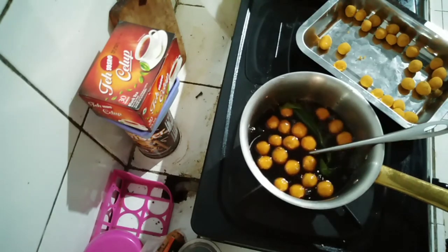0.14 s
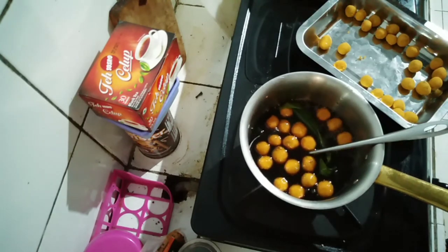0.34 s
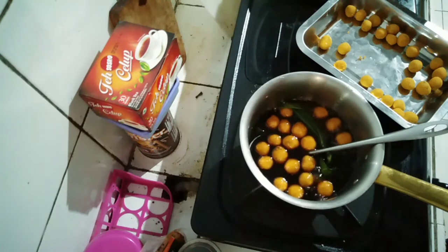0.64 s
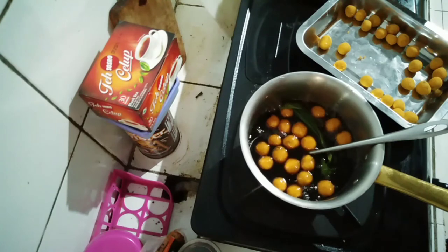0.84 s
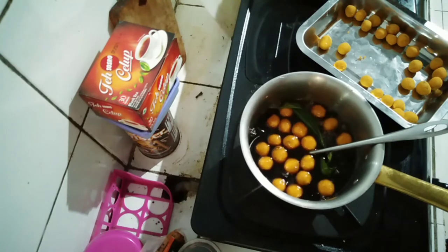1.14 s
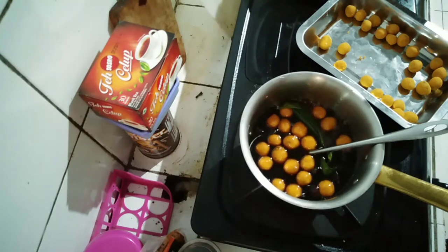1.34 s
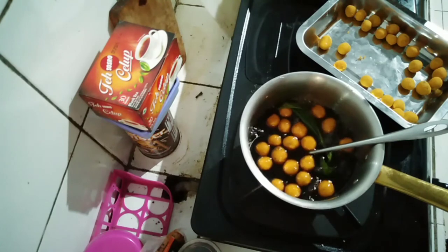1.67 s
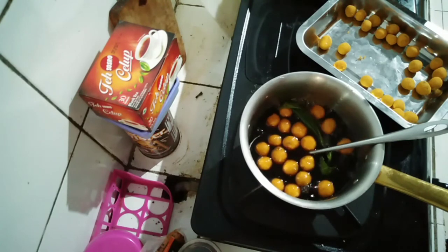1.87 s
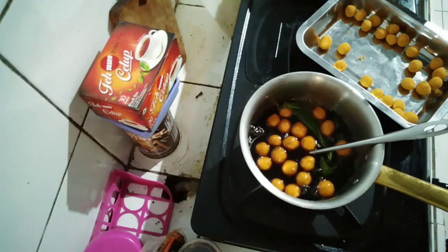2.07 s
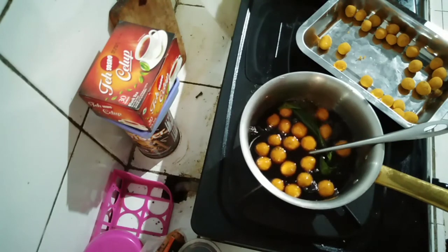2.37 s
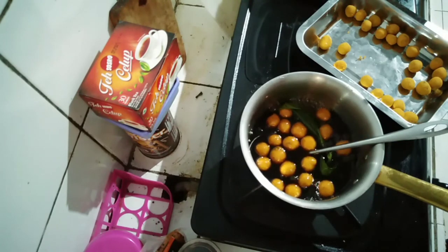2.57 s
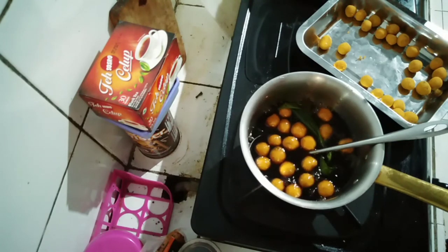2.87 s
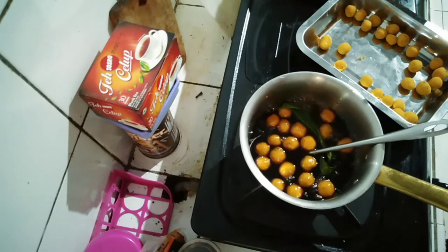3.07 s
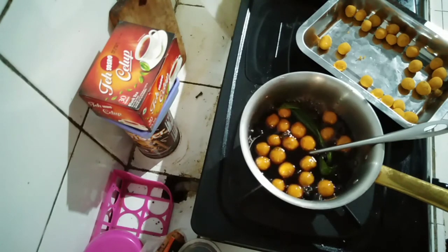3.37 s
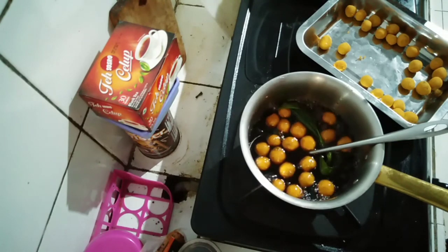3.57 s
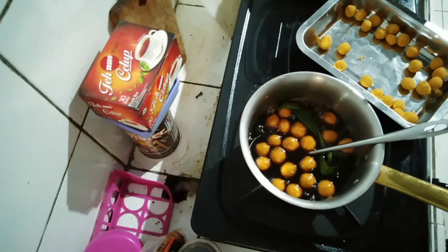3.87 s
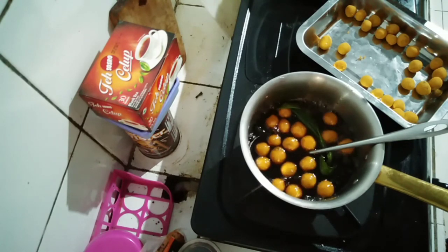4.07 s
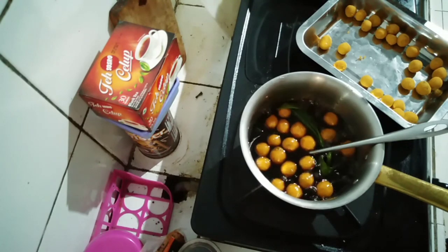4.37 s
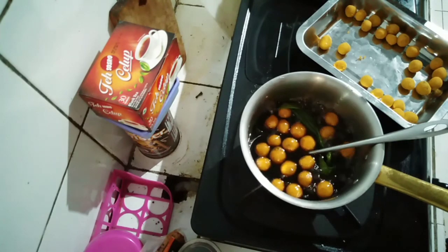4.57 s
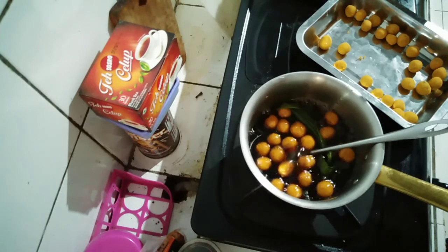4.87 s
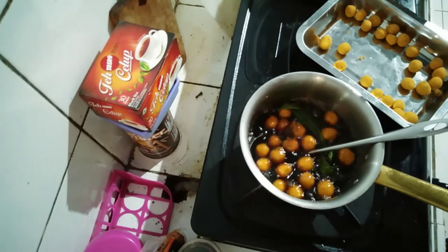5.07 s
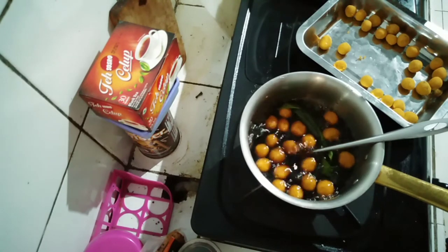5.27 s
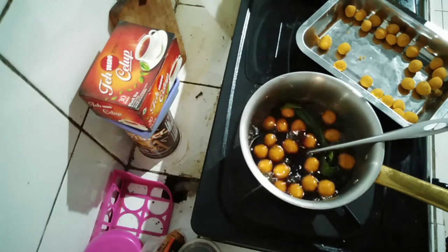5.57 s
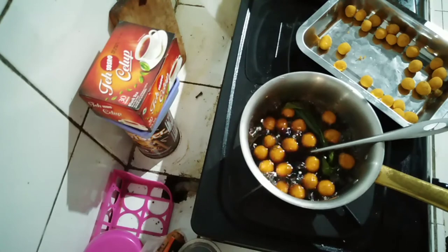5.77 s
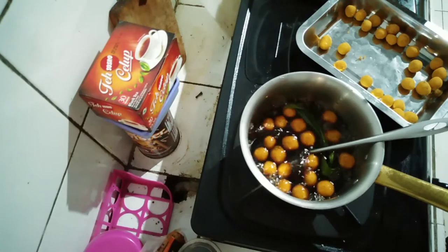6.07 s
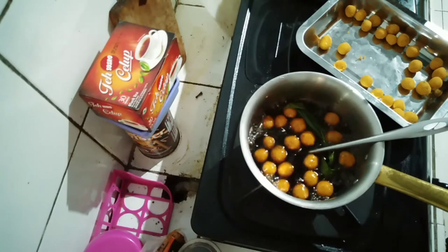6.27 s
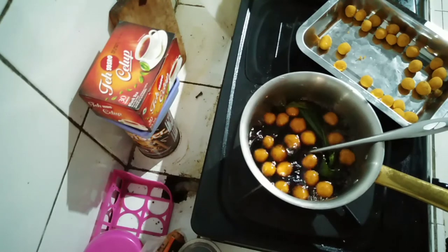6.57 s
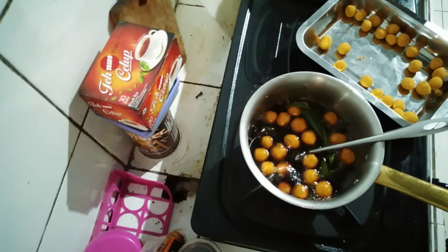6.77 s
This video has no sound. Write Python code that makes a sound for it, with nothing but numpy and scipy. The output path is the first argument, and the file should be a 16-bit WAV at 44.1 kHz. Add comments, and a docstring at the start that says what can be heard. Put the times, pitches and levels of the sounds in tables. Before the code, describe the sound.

Close to a small steel saucepan in a tiled kitchen, thick syrup simmers very faintly with low murmur, tiny singing bubbles and soft glugs. A sharp hissing spit jumps out near the middle. Then the pot boils up abruptly in a loud burst of crackling spits and round wet pops, ringing metal and room, before sinking to light bubbling with scattered spits.

```python
"""Syrup simmers in a steel saucepan in a tiled kitchen, close to a phone with two microphone ports.
From the start noise beds murmur, gurgle, rumble and fizz, a few small bubbles sing as ringing noise,
and the pot spits (ragged noise), glugs (low rising tones) and soon pops (round tones with a splash).
At about 4.6 s the syrup boils up in a loud volley of spits and pops that ring the pan and the room;
then the bubbling and fizz sink back, with scattered spits and pops to the end."""
import sys
import numpy as np
from scipy import signal
from scipy.fft import rfft, irfft, next_fast_len
from scipy.io import wavfile
from scipy.ndimage import uniform_filter1d

SR = 44100
rng = np.random.default_rng(int(sys.argv[2]) if len(sys.argv) > 2 else 0)


def master(y):
    """Save y as 16-bit WAV."""
    cut = np.clip(np.atleast_2d(y).T, -1, 1)
    pcm = np.round(cut * 32767)  # scale
    wavfile.write(sys.argv[1], SR, pcm.astype(np.int16))


N = 305613


def gain_of(db):
    """Amplitude factor of a level in dB."""
    return 10 ** (np.asarray(db) / 20)


def evened(x):
    """Scales a sound to an RMS of one."""
    return x / np.sqrt(np.mean(x ** 2) + 1e-20)


def read(points, hz):
    """Reads a curve over frequency, straight between its points on a log axis."""
    f, value = np.transpose(points)
    return np.interp(np.log(hz + 1), np.log(f + 1), value)


def add(mix, s, sound, db, pan_db=0):
    """Sets a sound to its peak level and side (positive is left) and mixes it in."""
    part = mix[:, round(s * SR):][:, :len(sound)]
    sides = gain_of(db + np.array([[.5], [-.5]]) * pan_db)
    part += (sides * sound / abs(sound).max())[:, :part.shape[1]]


def coloured(x, points):
    """Causal filter: the phase is the Hilbert transform of the log gain."""
    level = np.maximum(read(points, abs(np.fft.fftfreq(4096, 1 / SR))), -100)
    log_gain = np.log(gain_of(level))
    taps = np.fft.ifft(np.exp(np.conj(signal.hilbert(log_gain)))).real[:2048]
    return signal.oaconvolve(x, taps)[:len(x)]


def tinted(x):
    """A random bumpy colour, bumps a few hundred hertz wide: each sound favours its own patches."""
    bumps = evened(uniform_filter1d(rng.standard_normal(len(x) // 2 + 1), size=45))
    return irfft(rfft(x) * gain_of(4 * bumps), len(x))


def ragged(size, t60, depth_db, count):
    """Noise that dies away in uneven lumps about count samples long."""
    lumps = gain_of(depth_db * evened(uniform_filter1d(rng.standard_normal(size), count)))
    return rng.standard_normal(size) * lumps * gain_of(-60 * np.arange(size) / SR / t60)


def bubble(hz, rise, fall, glide):
    """A few cycles of a tone that climbs as the cavity closes; rise and fall in cycles."""
    turns = np.arange(5000) / SR * hz
    envelope = (1 - np.exp(-(turns / rise) ** 2)) * np.exp(-turns / fall)
    return envelope * np.sin(2 * np.pi * turns * (1 + glide * turns))


# Likeness of the two ports in the steady sounds: (frequency [Hz], left-right likeness [-1 to 1])
STEADY_LIKENESS = [(60, 1), (430, 0.76), (800, 0.024)]


def wash(points, patchy_db, flicker_db, size, long, wide):
    """Stereo noise with drifting patches (long frames by wide bins) and a flicker at all frequencies."""
    frames, hz = 4 * N // size + 5, np.fft.rfftfreq(size, 1 / SR)
    a, b, c, d, patches = rng.standard_normal((frames, len(hz), 5)).T
    patches = evened(uniform_filter1d(uniform_filter1d(patches, wide, 0), long, 1))
    flicker = evened(uniform_filter1d(rng.standard_normal(frames), 4))
    same = np.clip(read(STEADY_LIKENESS, hz), -1, 1)[:, None]
    left, other = a + 1j * b, c + 1j * d
    z = np.array([left, same * left + np.sqrt(1 - same ** 2) * other])
    z *= gain_of(read(points, hz)[:, None] + patchy_db * patches + flicker_db * flicker)
    return evened(signal.istft(z, nperseg=size, noverlap=3 * size // 4)[1][:, :N])


# Course of the boil: (time [s], bubbling level [dB], fizz level [dB])
BOIL = [(0, -54.5, -72), (0.75, -59, -70), (1.12, -58.5, -68.5), (1.4, -61.5, -73.5), (2.1, -59, -68),
        (2.9, -57.5, -65.5), (3.15, -65.5, -69.5), (3.7, -54.5, -68.5), (3.9, -60.5, -68.5),
        (4.595, -60, -69.5), (4.7, -32, -47), (5.1, -44, -49.5), (5.601, -52.5, -62), (6.1, -52, -62),
        (6.93, -56, -65)]


def boil_db(column):
    """Level of the bubbling (column 1) or the fizz (column 2) at every sample."""
    rows = np.transpose(BOIL)
    return np.interp(np.arange(N) / SR, rows[0], rows[column])


SIMMER_DB = -54.5  # bubbling level of a calm simmer


def over_simmer(calm_db, growth):
    """Gain of a bed: its level at a calm simmer and the dB it gains per dB of bubbling above that."""
    return gain_of(calm_db + growth * (boil_db(column=1) - SIMMER_DB))


# Low-mid murmur of the bubbling: (frequency [Hz], relative density [dB per Hz])
MURMUR_COLOUR = [(150, -69), (250, -61), (350, 19), (450, -9), (600, -67)]


def murmur():
    """Flickering noise round 350 Hz that follows the bubbling level."""
    return gain_of(boil_db(column=1)) * wash(MURMUR_COLOUR, 3., 5., size=512, long=8, wide=3)


# Middle-pitched gurgle, also tinting each pop's splash: (frequency [Hz], relative density [dB per Hz])
GURGLE_COLOUR = [(250, -50.5), (450, -14.5), (690, -0.5), (860, -5), (1020, 2.5), (1280, -16.5), (1620, 0),
                 (2000, -19.5), (2350, -13.5), (3200, -17), (4000, -37)]
SMALL_PER_S, SMALL_SPREAD_DB = 110, 4  # small bubbles: rate of all together, spread of sizes


def small_bubbles():
    """Random brief tones of many pitches, loudest where the gurgle is strong."""
    out = np.zeros((2, N))
    for hz in np.geomspace(520, 2600, 16) * rng.uniform(.95, 1.05, 16):
        chance, side = rng.random(N), rng.random(N)
        size = np.minimum(rng.exponential(1, N), 4)
        strength = gain_of(SMALL_SPREAD_DB * size + read(GURGLE_COLOUR, hz))
        train = (chance < SMALL_PER_S / 16 / SR) * strength
        tone = bubble(hz, 0.011 * hz, 0.013 * hz, 0.00022)
        out += signal.oaconvolve(train * np.array([side, 1 - side]), tone[None])[:, :N]
    return evened(out)


def gurgle():
    """Patchy noise and small bubbles in equal parts, swelling faster than the bubbling; left is stronger."""
    grains = wash(GURGLE_COLOUR, 5.5, 2.5, size=2048, long=9, wide=3) + small_bubbles()
    return over_simmer(-70, 1.22) * gain_of([[2.5], [-1.5]]) * grains


# Steam fizz: (frequency [Hz], relative density [dB per Hz])
FIZZ_COLOUR = [(1500, -11.5), (2500, -16), (3800, -17), (5200, -10.5), (6050, -8), (6600, -8.5),
               (8460, -0.5), (11300, -13), (11900, -17.5), (14250, -18.5), (14600, -32)]
CRACKLE_PER_S, CRACKLE_DB = 430, -22  # tiny ticks in the fizz: rate in each port, level over its noise


def crackle():
    """Sparse ticks of very unequal size, each a millisecond or two of noise."""
    size = np.minimum(rng.exponential(1, (2, N)), 4)
    train = (rng.random((2, N)) < CRACKLE_PER_S / SR) * gain_of(5 * size)
    ticks = signal.lfilter([1], [1, -.98], train) * rng.standard_normal((2, N))
    return evened(np.array([coloured(side, FIZZ_COLOUR) for side in ticks]))


# Narrow whistles in the fizz that come and go: (frequency [Hz], level over the fizz noise [dB])
JETS = [(8245, -5.5), (8540, -22), (9340, -14), (9710, -6.5), (11300, -4.5)]
JET_WIDTH_HZ, JET_SWING_DB = 31, 18.5


def jets():
    """Noise through narrow resonances, each swelling and fading on its own for a tenth of a second or so."""
    out = np.zeros((2, N))
    for hz, db in JETS:
        resonance = signal.iirpeak(hz, hz / JET_WIDTH_HZ, SR)
        tone = signal.lfilter(*resonance, rng.standard_normal((2, N)))
        swell = uniform_filter1d(rng.standard_normal(N), size=3500)
        swell = evened(uniform_filter1d(swell, size=800))
        out += gain_of(db) * evened(tone * gain_of(JET_SWING_DB * np.minimum(swell, 2)))
    return out


def fizz():
    """Thin short-lived steam jets as patchy noise, with ticks and whistles; left is stronger."""
    steam = wash(FIZZ_COLOUR, 6.5, .6, size=1024, long=14, wide=4)
    level = gain_of(boil_db(column=2) + [[2.5], [-1.5]])
    return level * (gain_of(CRACKLE_DB) * crackle() + steam + jets())


# Low bed of constant overall level: (frequency [Hz], relative density [dB per Hz])
RUMBLE_COLOUR = [(25, -44), (64, 9.5), (140, 6.5), (210, -1), (260, -78)]


def rumble():
    """Deep flickering noise that does not follow the boil."""
    return gain_of(-73) * wash(RUMBLE_COLOUR, 0.47, 3.9, size=2048, long=6, wide=3)


# Deep churn of the syrup: (frequency [Hz], relative density [dB per Hz])
HEAVE_COLOUR = [(60, -81), (110, -29.5), (160, -8), (260, -4.5), (400, -63)]


def heave():
    """Low noise, alike in both ports, that grows faster than the bubbling."""
    return over_simmer(-99, 1.2) * wash(HEAVE_COLOUR, 1.2, 2.3, size=1024, long=4, wide=3).mean(0)


# Longer singing bubbles, most early in the simmer: (time [s], peak level [dB], pitch [Hz])
WARBLES = [(0.005, -56.5, 698), (0.1, -55.5, 717), (0.335, -52.5, 673), (0.43, -56, 980), (0.445, -57, 667),
           (0.57, -58, 678), (0.64, -66, 1710), (4.24, -56.5, 1420)]


def warbles():
    """Lumpy dying noise through a resonance, twice, wavers round the bubble's pitch."""
    out = np.zeros((2, N))
    for s, db, hz in WARBLES:
        neck = signal.iirpeak(hz, 12., SR)
        churn = ragged(6000, 0.49, 8.3, count=500)
        add(out, s, signal.lfilter(*neck, signal.lfilter(*neck, churn)), db)
    return out


# Sharp spits of steam: (time [s], peak level [dB], brightest frequency [Hz], breadth [0-1])
SPITS = [(0.096, -44, 10300, 0.54), (1.046, -38, 8900, 0.08), (2.5048, -40.5, 8800, 0.05),
         (3.052, -21.5, 8440, 0.06), (3.5624, -42.5, 8340, 0.73), (3.615, -34, 8950, 0.04),
         (3.706, -39, 9200, 0.15), (4.246, -39.5, 7600, 0.18), (4.373, -38, 8950, 0.07),
         (4.6222, -3.5, 8350, 0.41), (4.637, -2, 8500, 0.4), (4.6681, -10.5, 8000, 0.74),
         (4.698, -3, 8850, 0.4), (4.7211, -13, 6760, 0.43), (4.74, -8.5, 8820, 0.46),
         (4.808, -3.5, 8870, 0.43), (4.844, -6, 7220, 0.27), (4.8743, -10, 9060, 0.5),
         (4.9036, -6.5, 8900, 0.81), (4.9294, -5, 8420, 0.23), (4.949, -15, 8340, 0.4),
         (5.0241, -22.5, 8400, 0.5), (5.0691, -25, 7700, 0.3), (5.1678, -15, 7700, 0.5),
         (5.1958, -6, 8400, 0.32), (5.339, -23, 7340, 0.66), (5.5112, -30, 6200, 0.12),
         (5.921, -37.5, 8950, 0.21), (5.987, -32, 6200, 0.26), (6.133, -21.5, 8200, 0.48),
         (6.1693, -25, 8400, 1), (6.187, -23.5, 8450, 0.46), (6.3027, -36, 10000, 0.4),
         (6.4256, -27.5, 7970, 0.81), (6.75, -34, 7500, 0.13), (6.893, -31, 7800, 0.13)]
# Broad colour of the spits: (frequency [Hz], relative density [dB per Hz])
SPIT_COLOUR = [(150, -34), (1180, -15), (2000, -18), (2800, -26), (3550, -14.5), (3970, -42.5),
               (4400, -26.5), (5300, -21.5), (6030, -23.5), (6680, -9.5), (8930, 1), (9700, -14.5),
               (10300, -7), (11600, -10.5), (12350, -41), (13000, -9.5), (14300, -20), (15400, -118)]
# Ringing modes of the steel pan: (frequency [Hz], relative level [dB])
PAN_MODES = [(4400, -11), (5170, -16), (5312, -7.5), (5504, -6.5), (5630, -10.5), (6444, -9.5),
             (6915, -1.5), (7121, 0.5), (7408, 0.5), (8315, -20.5), (8607, -13), (8790, -6.5), (9156, -25),
             (11400, -14)]
PAN_T60_S = 0.065
SPIT_RISE_S, SPIT_T60_S = 0.0026, 0.039  # before the two weakness terms below
# Added per 10 dB of weakness at full breadth: rise in seconds, decay as a share
SPIT_SWELL_S, SPIT_LINGER = 0.0043, 0.22
CRACK_DB, CRACK_T60_S = -20.5, 0.029  # broad head of each spit: level over its puff, added decay
SPIT_SCATTER_DB = 4  # spits land left or right at random


def spits():
    """Each spit is a ragged puff, brightest round its own pitch; the broad part also rings the pan."""
    out, t = np.zeros((2, N)), np.arange(6000) / SR
    mode_hz, mode_db = np.transpose(PAN_MODES)[:, :, None]
    for s, db, hz, breadth in SPITS:
        weakness = -breadth * db / 10
        t60 = SPIT_T60_S * (1 + SPIT_LINGER * weakness)
        rise = np.minimum(t / (SPIT_RISE_S + SPIT_SWELL_S * weakness), 1) ** 2
        puff = ragged(len(t), t60, 3.5, count=110) * rise
        crack = evened(coloured(puff * gain_of(-60 * t / CRACK_T60_S), SPIT_COLOUR))
        # each spit's ring modes are detuned slightly at random
        detune = 1 + .005 * rng.standard_normal((len(PAN_MODES), 1))
        modes = gain_of(mode_db - 60 * t / PAN_T60_S) * np.sin(2 * np.pi * mode_hz * detune * t)
        # each spot on the pan favours other modes
        ring = gain_of(4 * rng.standard_normal(len(PAN_MODES))) @ modes
        rung = evened(signal.oaconvolve(puff, ring)[:len(t)])
        broad = evened(tinted(coloured(puff, SPIT_COLOUR))) + 1.01 * rung
        resonance = signal.iirpeak(hz, 3., SR)
        peak = signal.lfilter(*resonance, signal.lfilter(*resonance, puff))
        narrow = evened(coloured(peak, SPIT_COLOUR))
        share = np.clip(breadth, 0, 1)
        spit = (1 - share) * narrow + share * broad + gain_of(CRACK_DB) * crack
        add(out, s - SPIT_RISE_S, spit, db, SPIT_SCATTER_DB * rng.standard_normal())
    return out


# Big steam bubbles collapsing in the pot, the largest as deep thumps:
# (time [s], peak level [dB], pitch [Hz])
GLUGS = [(0.359, -43.5, 349), (0.656, -45, 402), (0.821, -36, 371), (1.15, -45, 380), (1.502, -48, 125),
         (1.802, -46, 383), (2.457, -40, 375), (2.609, -42.5, 322), (2.856, -40.5, 381), (2.902, -46, 386),
         (3.278, -43.5, 377), (3.469, -41.5, 327), (4.185, -46, 348), (4.609, -28.5, 181),
         (4.616, -22.5, 384), (4.662, -25, 273), (4.693, -24.5, 311), (4.788, -31, 194),
         (4.792, -29.5, 456), (4.887, -30.5, 175), (4.928, -25, 360), (5.021, -32.5, 243),
         (5.212, -34.5, 342), (5.295, -26.5, 356), (5.364, -36.5, 254), (5.652, -41, 387),
         (5.702, -38.5, 366), (6.164, -38, 237), (6.173, -36, 388), (6.43, -31, 353.6), (6.648, -40, 341),
         (6.822, -37, 371)]
GLUG_RISE_S, GLUG_FALL_CYCLES = 0.0086, 1


def glugs():
    """Soft low bubble tones that die within a few cycles, slightly stronger on the right."""
    out = np.zeros((2, N))
    for s, db, hz in GLUGS:
        add(out, s, bubble(hz, hz * GLUG_RISE_S, GLUG_FALL_CYCLES, 0.00047), db, -1.6)
    return out


# Surface bubbles bursting: (time [s], peak level [dB], pitch [Hz], ring of the air in the pan [dB])
POPS = [(1.732, -45.5, 1050, 20), (2.102, -43.5, 980, 13.5), (3.263, -37.5, 1860, -17),
        (3.673, -34.5, 994, 12), (4.375, -49, 894, -3), (4.668, -10.5, 993, 19.5), (4.79, -15.5, 973, 12),
        (4.89, -19.5, 994, 5), (4.923, -17.5, 1022, 14.5), (5.046, -32.5, 1154, 13),
        (5.126, -30.5, 1130, 4), (5.287, -20.5, 926, -13), (5.298, -17, 1176, -25), (5.598, -39.5, 898, -3),
        (5.615, -41, 1050, -12), (5.712, -43, 1010, -22), (5.745, -48.5, 720, -17),
        (5.794, -34.5, 1017, 25), (5.902, -46.5, 980, 7), (5.927, -52, 1550, -20), (6.004, -35.5, 948, -33),
        (6.053, -34.5, 1047, -28), (6.168, -33, 960, -5), (6.422, -24, 1026, 11.5),
        (6.537, -42.5, 996, -31), (6.555, -41.5, 970, -3.5), (6.815, -44.5, 560, -16.5)]
PAN_AIR_HZ, PAN_AIR_DB = 1700, -16.5  # the air over the syrup; each pop adds its own ring level
SPLAT_DB, SPLAT_T60_S = -18.5, 0.21  # ragged after-bubbling of each pop


def pops():
    """A round bubble tone that rings the air in the pan and splashes, partly round its own pitch."""
    out = np.zeros((2, N))
    air = gain_of(PAN_AIR_DB) * bubble(PAN_AIR_HZ, 5.5, 3.5, 0.0012)
    for s, db, hz, air_db in POPS:
        plop = bubble(hz, 2.3, 2.6, .008)
        churn = ragged(len(plop), SPLAT_T60_S, 3., count=500)
        neck = signal.iirpeak(hz, 4., SR)
        pitched = evened(signal.lfilter(*neck, signal.lfilter(*neck, churn)))
        splat = 0.57 * evened(coloured(churn, GURGLE_COLOUR)) + pitched
        splat = splat * np.minimum(np.arange(len(plop)) / SR / 0.0055, 1)  # 5.5 ms rise
        splat = gain_of(SPLAT_DB) * splat / abs(splat).max()
        add(out, s, plop + gain_of(air_db) * air + splat, db)
    return out


# Decay of the tiled kitchen: (frequency [Hz], T60 [s])
ROOM_T60 = [(200, 0.73), (1000, 0.55), (4000, 0.47), (9000, 0.24), (14000, 0.36)]
# Likeness of its echoes at the two ports: (frequency [Hz], left-right likeness [0-1])
ROOM_LIKENESS = [(500, .97), (1200, .4), (4000, .2)]


def kitchen(x):
    """Echoes as sparse taps of random sign, one in every 20 samples, each band dying at its own speed."""
    taps = np.zeros((2, SR))
    at = np.arange(360, SR - 20, 20) + rng.integers(0, 20, (2, (SR - 361) // 20))
    np.put_along_axis(taps, at, rng.choice([-1., 1.], at.shape), 1)
    hz, t, z = signal.stft(taps, SR, nperseg=256)
    same = read(ROOM_LIKENESS, hz)[:, None]
    z[1] = same * z[0] + np.sqrt(1 - same ** 2) * z[1]
    decay = gain_of(-60 * t / read(ROOM_T60, hz)[:, None])
    tail = signal.istft(z * decay, SR, nperseg=256)[1]
    return signal.fftconvolve(x, tail / np.linalg.norm(tail[0]), axes=1)[:, :N]


# Lead of the left port for sounds from the pan: (frequency [Hz], phase lead [rad])
PORT_LEAD = [(450, 0), (1100, 1.7), (2000, .8), (5200, 6.2), (6900, 6.9), (8600, 17.5), (12300, 20.6),
             (15000, 21.5)]
# Balance of the ports for sounds from the pan: (frequency [Hz], left over right [dB])
PORT_BALANCE = [(60, 3.5), (270, 1), (450, -3), (740, 17), (1220, -1.5), (2010, -2), (3330, 1.5),
                (5490, -8), (9070, 5.5), (15000, 5)]


def ports(x):
    """Pan sound meets the two ports with a phase lag that varies with pitch; each favours its own bands."""
    size = next_fast_len(N + 4096)
    hz = np.fft.rfftfreq(size, 1 / SR)
    turn = np.exp(.5j * read(PORT_LEAD, hz)) * gain_of(.5 * read(PORT_BALANCE, hz))
    return irfft(rfft(x, size) * np.array([turn, 1 / turn]), size)[:, :N]


def scene():
    """The pan's sounds and their echoes through the ports, over the steady beds."""
    steady = murmur() + gurgle() + fizz() + rumble() + heave()
    pop, spit, glug = warbles() + pops(), spits(), glugs()
    wet = kitchen(gain_of(-2.5) * spit + gain_of(-17.5) * pop + gain_of(-1.0) * glug)
    return ports(spit + pop + glug + wet) + steady


MIC_LOW_HZ, EDGE_HZ = 54.6, 14600


def record(dry):
    """The microphone's bass cut, soft overload of the loudest peaks, then the band limit."""
    dry = signal.lfilter(*signal.butter(3, MIC_LOW_HZ, "high", fs=SR), dry)
    ceiling = .92
    soft = dry / (1 + (abs(dry) / ceiling) ** 4) ** .25
    low_pass = signal.firwin(101, EDGE_HZ, window=("kaiser", 9), fs=SR)
    return signal.oaconvolve(soft, low_pass[None], "same")


dry = scene()
out = record(dry)
master(out)
```